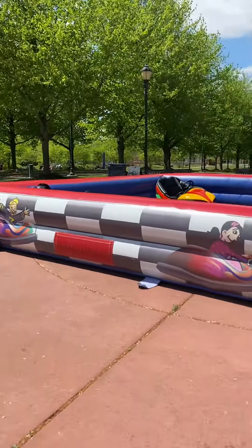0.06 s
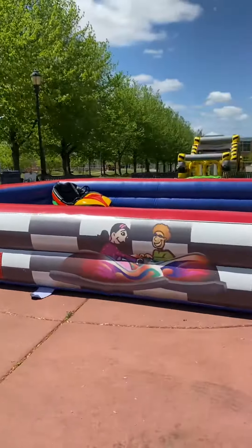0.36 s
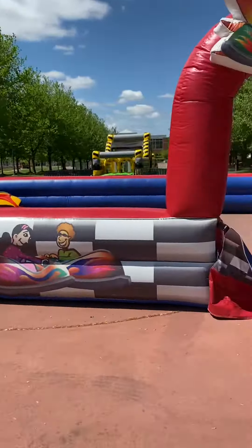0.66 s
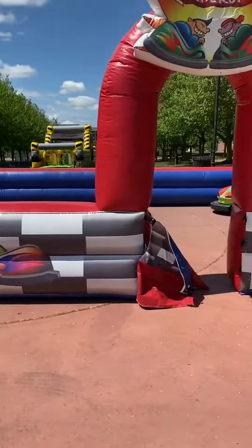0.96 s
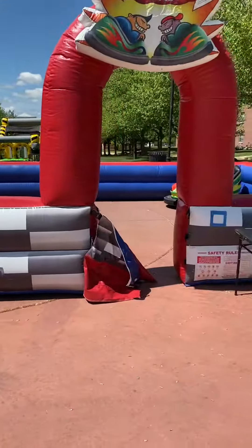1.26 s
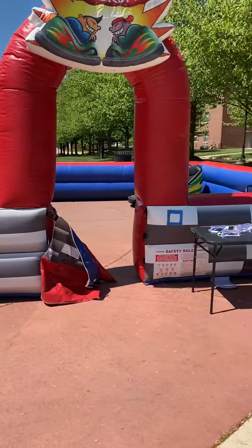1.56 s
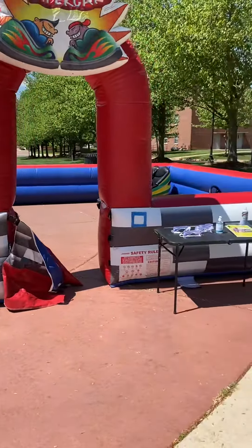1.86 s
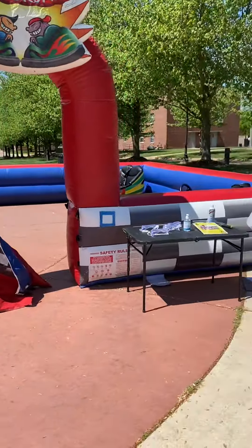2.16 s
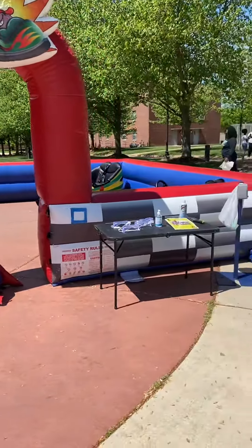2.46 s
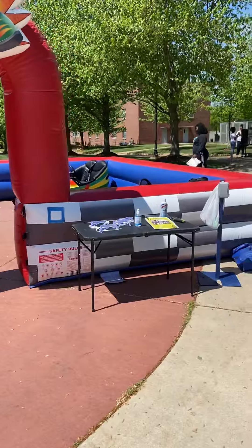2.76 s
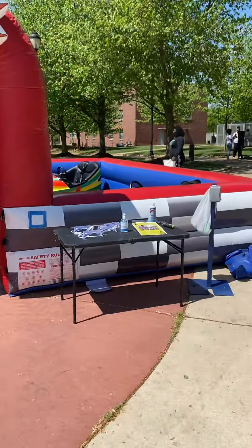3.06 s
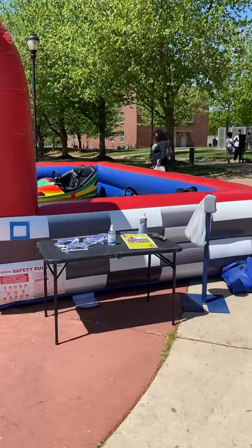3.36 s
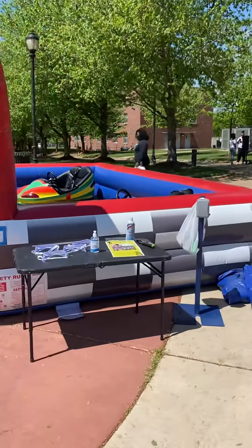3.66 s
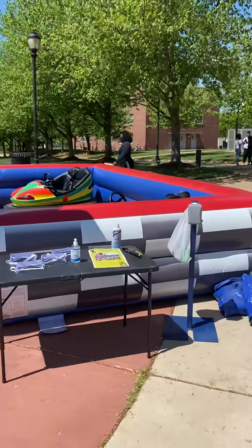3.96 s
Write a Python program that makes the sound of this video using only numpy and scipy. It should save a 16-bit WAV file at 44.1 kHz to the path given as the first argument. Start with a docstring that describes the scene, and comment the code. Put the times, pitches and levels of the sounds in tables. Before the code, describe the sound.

Two generator engines drone and throb steadily, with clatter, fan whine and rushing air.

```python
"""A low, throbbing drone with clatter, fan whine and rushing air, beside an inflatable race track.
Two one-cylinder, four-stroke generators power its air blowers. Each firing sends a puff through a
muffler; the engines run at nearly the same speed, so their notes beat slowly against each other.
The nearer one misfires and pops now and then. Clatter and hiss grow, and the middle pitches drift
to the right, as the microphone moves closer and turns."""
import sys
import numpy as np
from scipy import signal
from scipy.fft import rfft, irfft, next_fast_len
from scipy.io import wavfile
from scipy.ndimage import uniform_filter1d, map_coordinates

SR = 44100
rng = np.random.default_rng(int(sys.argv[2]) if len(sys.argv) > 2 else 0)


def put_to_file(sound):
    """Save the sound as 16-bit audio at rate SR, in the file named by the first command-line argument."""
    columns = np.atleast_2d(sound).T  # one column per channel
    safe = np.clip(columns, -1, 1)
    whole_steps = np.round(safe * 32767)
    wavfile.write(sys.argv[1], SR, whole_steps.astype(np.int16))


N = 176400

# tone colour of the clattering engine casing (pitch [Hz], level [dB])
CASING_COLOUR = [(20, -21.5), (200, 3), (330, 1.5), (480, 0), (620, -3), (730, -3), (980, -2), (1120, -0.5),
                 (1350, -6.5), (1600, -8.5), (1900, -5.5), (2150, -7), (2400, -5), (2800, -8.5),
                 (4000, -11.5), (6000, -24.5), (12000, -134)]


def amp(db):
    """Turn decibels into a number to multiply by."""
    return 10 ** (np.asarray(db) / 20)


def unit(x):
    """Scale a sound to an average (rms) level of 1."""
    return x / np.sqrt(np.mean(x ** 2) + 1e-20)


def along(points, hz):
    """Read between the rows of a (pitch, value) table, on a log pitch scale."""
    pitches, values = np.transpose(points)
    return np.interp(np.log(hz + 1), np.log(pitches + 1), values)


def curves(rows):
    """Turn each column after the time into one value per sample."""
    times, *columns = np.transpose(rows)
    return [np.interp(np.arange(N) / SR, times, column) for column in columns]


def wobble(rate):
    """A smooth curve through `rate` random values a second."""
    return map_coordinates(rng.standard_normal(1024), [np.arange(N) * rate / SR + 2], mode="wrap")


def filtered(x, response):
    """Change each pitch in x by response(hz)."""
    size = next_fast_len(N + SR // 2)
    return irfft(rfft(x, size) * response(np.fft.rfftfreq(size, 1 / SR)), size)[..., :N]


def rush(colour):
    """Stereo noise with the given tone colour."""
    # how alike left and right are (pitch [Hz], likeness [0 to 1])
    likeness = [(60, 1.0), (250, 1), (1100, 0.64), (1500, .5), (1900, 0.84), (2450, 0.31), (3400, 0.7),
                (4600, 0.18), (7400, 1), (15000, 1)]

    def middle_and_side(hz):
        spread = np.arccos(np.clip(along(likeness, hz), -1, 1)) / 2
        return amp(along(colour, hz)) * [np.cos(spread), np.sin(spread)]

    middle, side = filtered(rng.standard_normal((2, N)), middle_and_side)
    return unit(np.array([middle + side, middle - side]))


def patchy(x, depth_db):
    """Let the tone colour wander: patches of pitch get a little louder or softer."""
    bands = signal.stft(x, nperseg=1024)[2]
    patches = uniform_filter1d(rng.standard_normal(bands.shape[1:]), size=5, axis=0)  # smooth in pitch
    patches = uniform_filter1d(patches, size=18, axis=1)  # and in time
    return unit(signal.istft(bands * amp(depth_db * unit(patches)), nperseg=1024)[1][:, :N])


def muffler_ring(colour, size=16384, bass_lag_s=.01346, bass_hz=197.7):
    """A muffler's ring after one puff: the bass leaves later than the crack."""
    hz = np.fft.rfftfreq(size, 1 / SR)
    cepstrum = irfft(np.log(amp(along(colour, hz))))
    cepstrum[1:size // 2] *= 2  # folding this in half puts the ring after the puff
    cepstrum[size // 2 + 1:] = 0
    lag = 2 * np.pi * bass_lag_s * bass_hz * (1 - np.exp(-hz / bass_hz))
    return irfft(np.exp(rfft(cepstrum) - 1j * lag))


def exhaust(cycle, muffler, misfires, scatter_db, jitter_s):
    """One puff per firing, each a little different, rings the muffler."""
    times = np.interp(np.arange(int(cycle[-1]) + 1), cycle, np.arange(N) / SR)
    force_luck, time_luck = rng.standard_normal((256, 2))[:len(times)].T
    force = amp(scatter_db * force_luck)
    for when, share in misfires:
        force[np.argmin(abs(times - when))] *= share
    starts = np.clip((times + jitter_s * time_luck) * SR, 0, N - 1).astype(int)
    puffs = np.bincount(starts, force, N)
    return unit(signal.fftconvolve(puffs, muffler_ring(muffler))[:N])


def chamber(x, ring_hz=108, width_hz=46):
    """The near muffler's chamber delays the pitches it rings at, smoothing the puffs."""
    resonance = lambda hz: ring_hz ** 2 - hz ** 2 + 1j * hz * width_hz
    return filtered(x, lambda hz: np.conj(resonance(hz)) / resonance(hz))


def both_exhausts(near, far, far_db=-8):
    """The stumbling near engine and the steady far one puff through their own mufflers."""
    # tone colour of each muffler (pitch [Hz], level [dB])
    near_muffler = [(20, -40.5), (31, -18.5), (62, -30), (93, -1.5), (124, 3), (155, 3), (186, 4),
                    (217, -3.5), (248, -3.5), (280, -14.5), (340, -8), (440, -17), (520, -39), (900, -33),
                    (2000, -96.5)]
    far_muffler = [(20, -31), (62, -9), (93, -3), (124, 3), (155, -2.5), (217, -0.5), (280, 0), (310, -12),
                   (345, -2), (400, -9), (436, -3.5), (470, -15.5), (560, -18.5), (2000, -69)]
    # stumbles of the near engine (time [s], force left in the puff [0 to 1])
    misfires = [(.014, 0.27), (1.53, 0.89), (1.98, 0.9), (2.593, 0.13), (3.27, 0.3), (3.688, 1),
                (3.72, 0.22)]
    near_puffs = exhaust(near, near_muffler, misfires, scatter_db=1.43, jitter_s=.00004)
    far_puffs = exhaust(far, far_muffler, [], scatter_db=1.0, jitter_s=.00005)
    return chamber(near_puffs) + amp(far_db) * far_puffs


def exhaust_path(puffs, wall_db=-9, wall_delay_s=.0129, bass_hz=204, bark_db=-22.5):
    """The puffs arrive directly and off the inflatable's wall; the bass swells as the microphone nears."""
    # loudness of the exhaust's bass (time [s], level [dB])
    bass_levels = [(0, -30.5), (.4, -26), (.9, -23.5), (1.8, -22.5), (2.4, -22.5), (3, -20.5), (4, -21.5)]
    bass_db, = curves(bass_levels)
    echoed = unit(filtered(puffs, lambda hz: 1 + amp(wall_db) * np.exp(-2j * np.pi * hz * wall_delay_s)))
    bass = filtered(echoed, lambda hz: 1 / (1 + (hz / bass_hz) ** 8))
    return amp(bass_db) * bass + amp(bark_db) * (echoed - bass)


def crank_hum(cycle, waver_db=.4):
    """The crankshaft turns twice per firing and hums at that rate."""
    # loudness of the hum (time [s], level [dB])
    hum_levels = [(0, -22.5), (.7, -26), (1.1, -25), (1.6, -27), (2.3, -25), (2.7, -24.5), (3.3, -23.5),
                  (4, -22.5)]
    hum_db, = curves(hum_levels)
    return amp(hum_db + waver_db * wobble(7.53)) * np.sqrt(2) * np.sin(4 * np.pi * cycle)


def outdoor_rumble(level_db=-38):
    """A steady, low outdoor background."""
    # tone colour of the rumble (pitch [Hz], level [dB])
    colour = [(15, -18), (35, -1), (65, 12), (160, -1), (300, -6), (460, -3.5), (700, -19), (2000, -83)]
    return amp(level_db) * rush(colour)


def whine(cycle, tones, flutter, flutter_rate):
    """Tones that follow a spinning shaft, fluttering in level and timing."""
    out = np.zeros(N)
    for multiple, db in tones:
        start = np.exp(2j * np.pi * rng.random())
        drift = flutter * (wobble(flutter_rate) + 1j * wobble(flutter_rate))
        spin = np.exp(2j * np.pi * round(multiple) * cycle)
        out += amp(db) * unit(np.real((start + drift) * spin))
    return out


def engine_whine(near, far):
    """The casings and cooling fans sing high above the firing rate."""
    # each engine's tones (pitch [times the firing rate], level [dB])
    near_tones = [(24, -52), (25, -50.5), (34, -49), (36, -42), (38, -49.5), (61, -57.5), (78, -62)]
    far_tones = [(28, -47.5), (30, -50), (34, -42), (40, -48.5), (45, -51.5), (48, -52.5), (76, -52)]
    return (whine(near, near_tones, flutter=.56, flutter_rate=8.2)
            + whine(far, far_tones, flutter=.22, flutter_rate=9))


def blower(blade_hz=712):
    """The blower's blades make one fluttering tone while air rushes into its intake."""
    # loudness of the blower (time [s], blade tone [dB], intake rush [dB])
    levels = [(0, -48, -57), (1, -50, -58), (1.65, -58, -35.5), (2.2, -40, -41), (2.9, -46.5, -40.5),
              (3.4, -37, -35.5), (4, -40.5, -35.5)]
    # tone colour of the intake (pitch [Hz], level [dB])
    intake_colour = [(200, -51), (520, -13), (660, -12), (740, 6.5), (830, 0), (930, 3.5), (1050, 0),
                     (2000, -82)]
    blade_db, intake_db = curves(levels)
    blades = whine(blade_hz * np.arange(N) / SR, [(1, 0)], flutter=.72, flutter_rate=16)
    return amp(blade_db) * blades + amp(intake_db) * rush(intake_colour)


def cover_ring(level_db=-45):
    """The engine's cover rings at a steady level."""
    # tone colour of the cover (pitch [Hz], level [dB])
    colour = [(800, -36), (1020, 7), (1065, 17.5), (1135, 16), (1190, 22), (1400, -48)]
    return amp(level_db) * rush(colour)


def rattle(cycle, size=1420):
    """Casing noise that repeats with every firing, its pattern slowly changing."""
    place = (cycle * size).astype(int) % size
    loops = sum(wobble(2.453) * rng.standard_normal((2, size))[:, place] for _ in range(4))
    evened = loops / np.sqrt(uniform_filter1d(loops ** 2, size, axis=1))
    return unit(filtered(evened, lambda hz: amp(along(CASING_COLOUR, hz))))


def clatter(cycle, repeat_share=.25, valve_db=-9, valve_at_cycle=.333, valve_width_cycles=.023):
    """Casing noise swells with each turn of the crankshaft; a valve ticks once a cycle."""
    swell = 1 + .049 * np.cos(4 * np.pi * cycle)
    from_valve = (cycle - valve_at_cycle + .5) % 1 - .5
    tick = amp(valve_db) * np.exp(-(from_valve / valve_width_cycles) ** 2)
    noise = np.sqrt(1 - repeat_share) * rush(CASING_COLOUR) + np.sqrt(repeat_share) * rattle(cycle)
    return patchy(noise * (swell + tick), depth_db=1)


def air_hiss(level_db, waver_db=.61):
    """Rushing air hisses, wavering in level and tone colour."""
    # tone colour of the hiss (pitch [Hz], level [dB])
    colour = [(20, -56), (1000, -21), (3000, 1.5), (4200, -4.5), (5500, 4.5), (7400, -5.5), (10000, -6.5),
              (15800, -14)]
    return amp(level_db + waver_db * wobble(6.63)) * patchy(rush(colour), depth_db=3)


def fuel_pops(rise_s=.0015, fade_s=.06):
    """Unburnt fuel pops in the muffler, each time with a short, low thud."""
    # the pops (time [s], level the fade starts from [dB], pitch [Hz])
    pops = [(.016, -13, 100), (1.56, -11, 135), (1.595, -17, 95), (2.594, -18, 170), (3.7195, -5, 220)]
    out, t = np.zeros(N + SR), np.arange(SR // 4) / SR
    for when, db, hz in pops:
        loudness = amp(db - 60 * t / fade_s) * (1 - np.exp(-t / rise_s))
        out[int(when * SR):][:len(t)] += loudness * np.sin(2 * np.pi * hz * t)
    return out[:N]


def microphone_turn(x, balance_db):
    """As the microphone turns, its body shades the middle pitches; a balance below 0 dims the left."""
    # how strongly each pitch is shaded (pitch [Hz], strength [times the balance])
    shadow = [(330, 0), (480, .2), (700, .7), (1100, 1.2), (2300, .85), (4000, .3), (6000, 0)]
    hz, t, bands = signal.stft(x, SR, nperseg=512)
    lean = amp(along(shadow, hz)[:, None] * np.interp(t, np.arange(N) / SR, balance_db) / 2)
    gains = np.array([lean, 1 / lean]) / np.sqrt((lean ** 2 + lean ** -2) / 2)
    return signal.istft(bands * gains, SR, nperseg=512)[1][:, :N]


def scene():
    """Both engines, the blower and the outdoor rumble, heard from a moving microphone."""
    # speed of the near engine (time [s], firing rate [Hz])
    near_speed = [(0, 30.7), (.1, 31.06), (.4, 31.03), (.65, 30.85), (.95, 31.25), (1.2, 30.9), (1.5, 31.1),
                  (1.63, 30.65), (1.8, 31.04), (3.7, 31.05), (4, 31.25)]
    # the microphone nears and turns (time [s], clatter [dB], hiss [dB], left-over-right balance [dB])
    approach = [(0, -34, -52.5, 2.5), (0.3, -33.5, -50, -2), (2.08, -29.5, -45, -7.5),
                (2.38, -30, -44.5, -7), (2.43, -28.5, -44.5, -6.5), (2.6, -29, -44, -9),
                (3.7, -28.5, -44, -5.5), (4.0, -29, -43.5, -7.5)]
    far_hz, start_s = 31.2, .0057
    near_hz, = curves(near_speed)
    clatter_db, hiss_db, balance_db = curves(approach)
    # each engine's count of cycles so far: it fires at every whole number
    near = np.cumsum(near_hz) / SR - start_s * near_hz[0]
    far = far_hz * (np.arange(N) / SR - start_s)
    drone = exhaust_path(both_exhausts(near, far)) + crank_hum(near) + outdoor_rumble()
    growth = amp(.1 * (clatter_db - clatter_db.mean()))  # the whine grows a little with the clatter
    tones = growth * engine_whine(near, far) + blower() + cover_ring()
    casing = amp(clatter_db + 1.78) * clatter(near)
    hiss = air_hiss(hiss_db + 5)
    return microphone_turn(drone + tones + casing + hiss + fuel_pops(), balance_db)


def record(dry):
    """The microphone's two openings hear the scene out of step; the highest treble is cut."""
    # how far the left opening is ahead of the right (pitch [Hz], lead [radians])
    left_lead = [(200, 0), (350, -.8), (1100, -1.8), (2000, -.2), (2350, -1.4), (2700, -3.9), (3500, -5.4),
                 (5200, -6.7), (6600, -3.5), (7900, -2.9), (9700, -.3), (11200, .2), (12700, 2.9),
                 (14200, 3.4), (15600, 6.2)]
    sides, top_hz = np.array([[1], [-1]]), 15800
    return filtered(dry, lambda hz: np.exp(.5j * along(left_lead, hz) * sides) * (hz < top_hz))


dry = scene()
out = record(dry)
put_to_file(out)
```